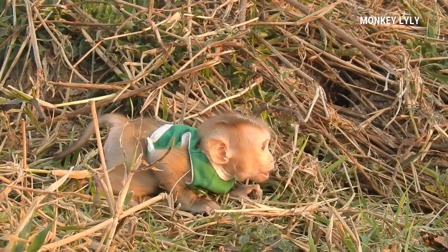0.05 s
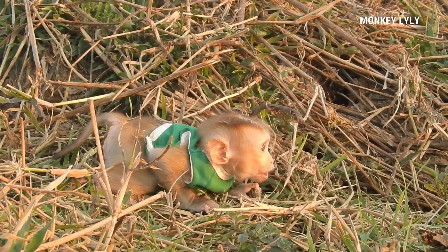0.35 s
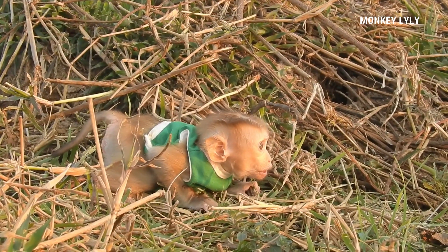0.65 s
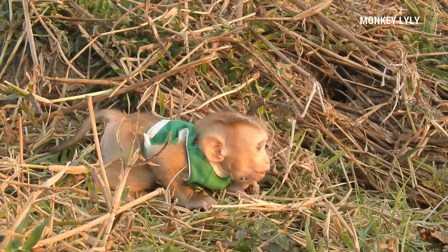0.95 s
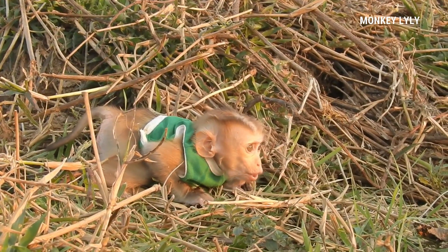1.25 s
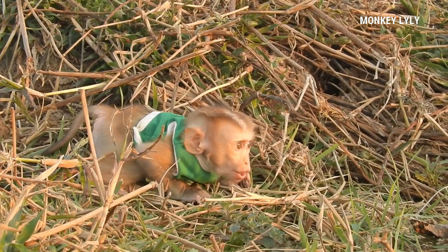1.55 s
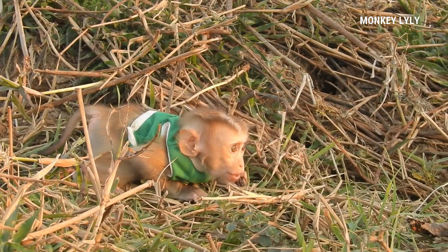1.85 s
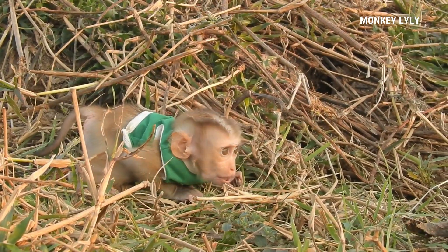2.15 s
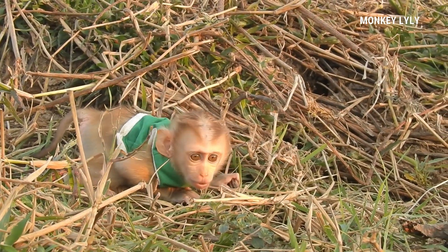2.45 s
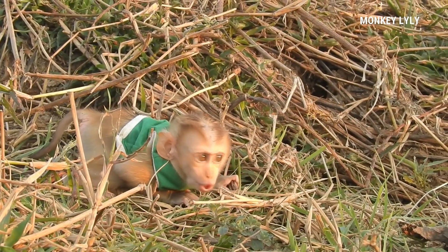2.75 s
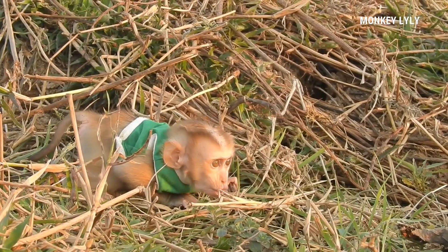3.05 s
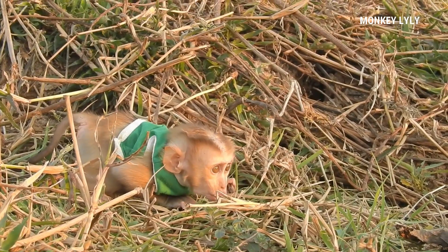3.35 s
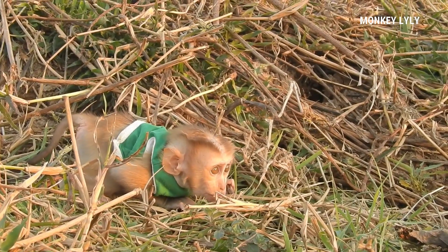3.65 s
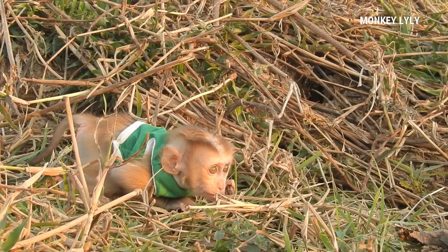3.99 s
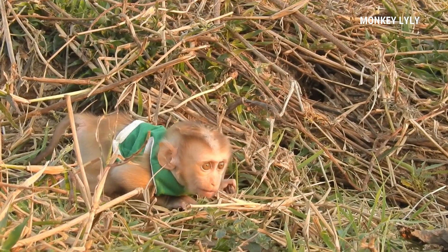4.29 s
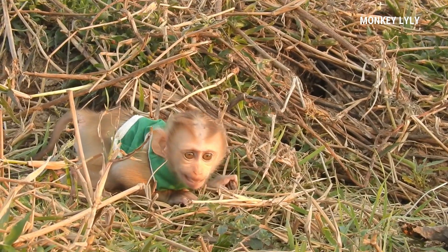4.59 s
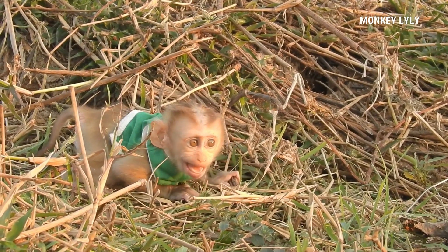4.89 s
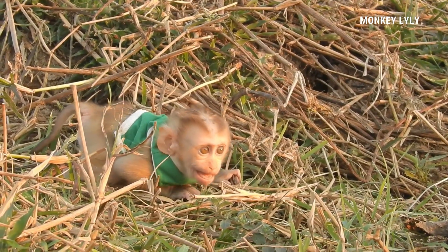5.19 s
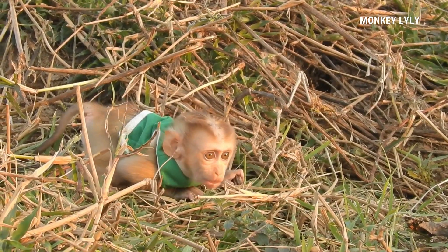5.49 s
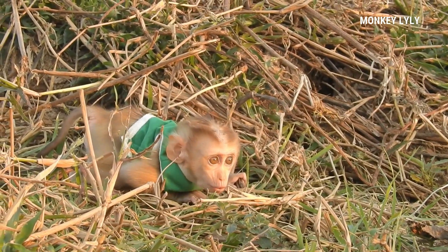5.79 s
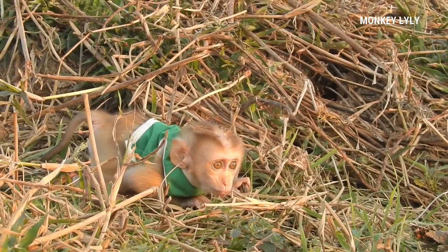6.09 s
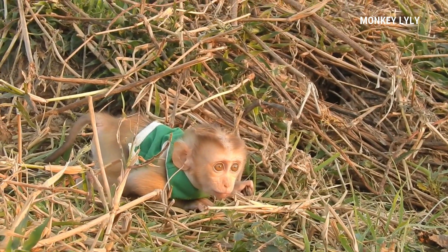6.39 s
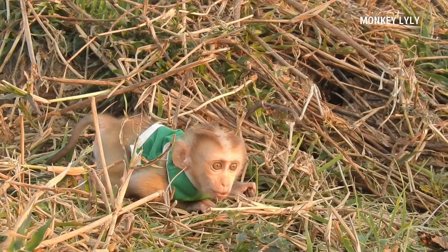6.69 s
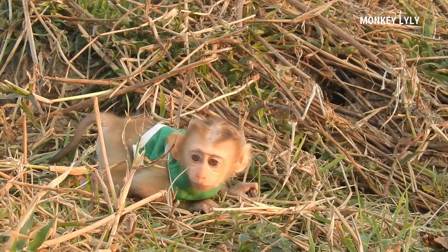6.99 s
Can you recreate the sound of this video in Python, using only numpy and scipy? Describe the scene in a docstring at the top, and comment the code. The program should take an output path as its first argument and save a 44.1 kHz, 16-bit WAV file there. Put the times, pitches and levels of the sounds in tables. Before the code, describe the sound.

Outdoors, over faint air, rumble and a distant hum, a baby monkey whimpers near the microphone. Its quick, high cries grow into a brief scream and two more cries, with a few thin bird chirps behind. The voice then breaks into short, hissy clicking grunts and ends with two coos, the first hoarse, the second softer. Dry straw crackles on and off as the animal shifts.

```python
"""A baby monkey crouches in dry straw, which rustles and snaps under it, over faint air, hum and rumble.
It opens with short, high, wavering coos, harmonics of its vocal folds shaped by the throat, and builds
to a scream at 2 s; a small bird chirps between 1.8 and 3 s. A grunt, two cries and a squeak follow.
From 3.7 s the voice breaks into clicking grunts whose pitch drops as the folds slacken.
A hoarse coo at 5.5 s and a softer one at 6.6 s close the scene."""
import sys
import numpy as np
from scipy import signal
from scipy.fft import rfft, irfft, next_fast_len
from scipy.io import wavfile
from scipy.ndimage import uniform_filter1d

SR = 44100
rng = np.random.default_rng(int(sys.argv[2]) if len(sys.argv) > 2 else 0)


def persist_wave(psi):
    """Save psi, clipped to +-1, as 16-bit WAV."""
    counts = np.round(np.clip(psi, -1, 1) * 32767).astype(np.int16)
    wavfile.write(sys.argv[1], SR, np.atleast_2d(counts).T)


N = 310483
TIME_S, BINS_HZ = np.arange(N) / SR, np.fft.rfftfreq(N, 1 / SR)
BAND_LIMIT_HZ = 15850


def amp(db):
    """Decibels to gain."""
    return 10 ** (np.asarray(db) / 20)


def unit(x):
    """Scale to rms 1."""
    return x / np.sqrt(np.mean(abs(x) ** 2) + 1e-20)


def read(points, hz):
    """Interpolate a spectrum on a log-frequency axis."""
    f, value = np.transpose(points)
    return np.interp(np.log(hz + 1), np.log(f + 1), value)


def add(mix, start_s, sound):
    """Mix a sound in at start_s."""
    part = mix[..., max(round(start_s * SR), 0):][..., :sound.shape[-1]]
    part += sound[..., :part.shape[-1]]


def wander(size, hz):
    """Complex random drift, rms about 1, bandwidth about hz."""
    f = np.fft.fftfreq(next_fast_len(size + 4000), 1 / SR)
    return unit(np.fft.ifft(np.exp(-.5 * (f / hz) ** 2 + 2j * np.pi * rng.random(len(f)))))[:size]


def ring(x, spectrum_db):
    """Minimum-phase filter with the given spectrum."""
    cepstrum = irfft(read(spectrum_db, np.fft.rfftfreq(2048, 1 / SR)) * np.log(10) / 20)
    cepstrum[1:1024] *= 2
    cepstrum[1025:] = 0
    return signal.oaconvolve(x, irfft(np.exp(rfft(cepstrum))))[:len(x)]


def fade(size, edge_s):
    """Flat window with soft ends."""
    i = np.arange(size)
    return np.sin(np.pi / 2 * np.minimum(np.minimum(i, i[::-1]) / (edge_s * SR), 1))


# Diffuse field. Each row: frequency in Hz, left-right coherence 0-1.
COHERENCE = [(60, 0.17), (250, 0.76), (600, 0.65), (5000, 0.057), (12000, 0.075)]


def diffuse(noises, spectrum_db):
    """Colour two noises into a diffuse sound, only partly alike left and right."""
    left, other = (unit(ring(noise, spectrum_db)) for noise in noises)
    same = read(COHERENCE, BINS_HZ)
    return np.array([left, irfft(same * rfft(left) + np.sqrt(1 - same ** 2) * rfft(other), N)])


# Open-air spectrum. Each row: frequency in Hz, gain in dB.
AIR_SPECTRUM_DB = [(20, -29), (60, -35), (110, -10), (170, 1), (260, -0.5), (400, -6), (700, -11.5),
                   (1200, -11), (2500, -17), (5000, -17), (8000, -23), (16000, -36.5)]


def air(level_db=-53.32, drift_db=1.1):
    """Open air: broad noise, slightly unsteady in level."""
    noise = diffuse(rng.standard_normal((2, N)), AIR_SPECTRUM_DB)
    return noise * amp(level_db + drift_db * wander(N, 4.6).real)


# Rumble envelope. Each row: time in seconds, level in dB.
RUMBLE_LEVEL_DB = [(0, -65), (1.1, -58.5), (2.3, -67), (2.7, -72), (3.35, -57.5), (3.6, -84), (4.3, -65.5),
                   (5.3, -50.5), (5.7, -59.5), (7.04, -76)]


def rumble():
    """Gusty low noise, strongest near 60 Hz."""
    spectrum_db = [(20, -32), (38, -18), (60, -4.5), (90, -8), (140, -10.5), (400, -59), (2000, -73)]
    noise = diffuse(rng.standard_normal((2, N)), spectrum_db)
    return noise * amp(np.interp(TIME_S, *np.transpose(RUMBLE_LEVEL_DB)))


# Hum envelope. Each row: time in seconds, level in dB.
HUM_LEVEL_DB = [(0, -56), (1.6, -57), (2.4, -61.5), (4.0, -77), (5.6, -64.5), (7.04, -57.5)]


def hum(pitch_hz=197.4, waver_hz=9):
    """A distant, wavering tone."""
    tone = (1 + 1.12 * wander(N, waver_hz)) * np.exp(2j * np.pi * pitch_hz * TIME_S)
    return amp(np.interp(TIME_S, *np.transpose(HUM_LEVEL_DB))) * tone.real


# Low bumps. Each row: start in seconds, length in seconds, centre in Hz, level in dB.
BUMPS = [(1.72, .12, 152, -50), (2.26, 0.11, 90, -51.5), (4.117, .06, 170, -49), (5.301, 0.063, 220, -41),
         (5.438, 0.051, 81, -33), (5.498, 0.063, 88.5, -37), (5.914, 0.085, 140, -46)]


def bumps(right_lead_rad=1.1):
    """Soft low bumps of unsteady pitch, the right side running a little ahead of the left."""
    out = np.zeros((2, N))
    for start_s, length_s, hz, db in BUMPS:
        size = round(length_s * SR)
        phase = 2 * np.pi * np.cumsum(hz * (1 + 0.39 * wander(size, 81).real)) / SR
        sway = np.sin([phase, phase + right_lead_rad])
        add(out, start_s, amp(db) * unit(sway * np.hanning(size)))
    return out


# Chirps. Each row: start in seconds, length in seconds, top pitch in Hz, relative level in dB.
CHIRPS = [(1.839, 0.028, 3560, -53), (1.882, 0.022, 3400, -54), (2.372, 0.017, 6480, -53),
          (2.477, 0.022, 6400, -48.5), (2.58, 0.025, 6600, -45), (2.685, 0.028, 6300, -49),
          (2.969, 0.031, 6090, -49)]


def bird(drop=0.46, gain_db=2.5):
    """Thin whistles that arch briefly and fall."""
    out = np.zeros(N)
    for start_s, length_s, top_hz, db in CHIRPS:
        u = np.linspace(0, 1, round(length_s * SR))
        hz = top_hz * (1 - drop * ((u - .25) / 0.72) ** 2)
        whistle = np.sin(2 * np.pi * np.cumsum(hz) / SR)
        add(out, start_s, amp(db + gain_db) * np.sin(np.pi * u) * whistle)
    return out


# Straw spectrum. Each row: frequency in Hz, gain in dB.
STRAW_SPECTRUM_DB = [(300, -11.5), (1000, -3), (2000, -3), (3500, -1), (5000, 1.5), (6300, 9.5), (7200, 2),
                     (8500, -12.5), (11000, -17.5), (16000, -31)]
# Body shifts. Each row: peak time in seconds, relative level in dB, rise and fall in seconds.
SHIFTS = [(1.3, -39, 0.034, .05), (1.49, -33.5, 0.052, 0.08), (1.939, -35, 0.019, 0.037),
          (2.5, -46.5, 0.089, 0.18), (3.06, -35, 0.016, 0.068), (3.65, -33.5, 0.022, 0.1),
          (4.3, -36.5, 0.098, 0.095), (4.93, -33.5, 0.046, 0.067), (5.385, -41, 0.025, 0.029),
          (5.99, -42.5, 0.43, 0.097), (6.55, -52, 0.14, 0.53)]


def rustle(slips_per_s=450, spread_db=6, gain_db=-8.5, still_db=-63):
    """Tiny slips of straw merge into a fizz that swells with each shift of the animal."""
    slipping = rng.random((2, N)) < slips_per_s / SR
    slips = slipping * amp(spread_db * np.minimum(rng.exponential(1, (2, N)), 4))
    fizz = diffuse(rng.standard_normal((2, N)) * (0.47 + slips), STRAW_SPECTRUM_DB)
    motion = sum(amp(db) * np.exp(-np.maximum((peak_s - TIME_S) / rise_s, (TIME_S - peak_s) / fall_s))
                 for peak_s, db, rise_s, fall_s in SHIFTS)
    return fizz * (amp(still_db) + amp(gain_db) * motion)


# Straw snaps. Each row: start in seconds, relative level in dB, relative body below 5 kHz in dB.
SNAPS = [(0.6369, -37, -8), (0.8475, -18.5, -9), (1.3946, -21, -5), (1.3963, -26.5, -9), (1.438, -31, -8),
         (1.513, -41, 9), (1.9421, -36.5, -6), (2.03, -28, -14), (2.4461, -39, -7), (3.0811, -35, -8),
         (3.6058, -32, -8), (3.8066, -34, 1), (4.2797, -34, -13), (4.3148, -34, -12), (4.3426, -41.5, 15),
         (4.4339, -40, 10), (4.559, -36.5, -19), (5.098, -36, -33), (5.8019, -24, -9.5), (5.9654, -34, -5),
         (5.9982, -31, -12), (6.717, -36, -1)]


def snaps(decay_s=0.0017, tail_db=-22, tail_s=0.053, gain_db=4):
    """A dry stalk cracks in a millisecond or two and shakes its neighbours."""
    out, t = np.zeros((2, N)), np.arange(1800) / SR
    hz, straw_db = np.transpose(STRAW_SPECTRUM_DB)
    envelope = np.exp(-t / decay_s) + amp(tail_db) * np.exp(-t / tail_s)
    for start_s, db, body_db in SNAPS:
        colour_db = straw_db + (body_db + 8.5) * np.clip(np.log2(5000 / hz), 0, 1)
        mid, side = rng.standard_normal((2, len(t))) * envelope
        crack = np.array([ring(mid + width * side, np.c_[hz, colour_db]) for width in (-.4, .4)])
        add(out, start_s, amp(db + gain_db) * crack / np.sqrt(np.sum(crack ** 2) / (0.0014 * SR)))
    return out


def bank_echo(x, t60_s=0.19, level_db=-29):
    """The straw bank scatters a short, faint echo."""
    t = np.arange(8000) / SR
    taps = rng.standard_normal((2, len(t))) * amp(-60 * t / t60_s) * (t > .002)
    return amp(level_db) * signal.oaconvolve(x, taps / np.linalg.norm(taps[0]), axes=1)[:, :N]


# Scatter off stalks. Each row: frequency in Hz, gain in dB.
SCATTER_DB = [(1000, -42.5), (2500, -14), (4000, -18.5), (6300, -9), (9000, -13), (12000, -17)]


def stalk_scatter(x, t60_s=0.013):
    """Nearby stalks throw back the treble, so left and right differ."""
    t = np.arange(900) / SR
    taps = rng.standard_normal(len(t)) * amp(-60 * t / t60_s)
    side = ring(signal.oaconvolve(x.mean(0), taps / np.linalg.norm(taps))[:N], SCATTER_DB)
    return np.array([side, -side])


# Wheezes. Each row: start in seconds, length in seconds, centre in Hz, relative level in dB.
WHEEZES = [(2.04, 0.058, 3800, -42), (2.084, 0.03, 4120, -29.5), (2.334, 0.012, 6240, -38.5),
           (5.57, 0.051, 4710, -32)]


def wheeze(start_s, length_s, hz, db, width_hz=260):
    """Turbulence swells in one throat resonance at a strained moment of a cry."""
    t = np.arange(round(length_s * SR)) / SR
    band = (wander(len(t), width_hz) * np.exp(2j * np.pi * hz * t)).real
    return start_s, amp(db) * unit(band * np.hanning(len(t)))


# Grunt resonances. Each row: frequency in Hz, gain in dB.
CHEST_SPECTRUM_DB = [(100, -65.5), (220, -8), (320, 11.5), (550, 9.5), (1100, 3.5), (1600, 8), (2200, -2),
                     (3000, 2), (6000, -70)]
RASP_SPECTRUM_DB = [(1300, -91.5), (2200, 2.5), (2600, -4.5), (3400, 5.5), (4100, -5), (4800, 0.5),
                    (5600, 3), (12000, -67)]
HISS_SPECTRUM_DB = [(2500, -29), (4600, -10.5), (5400, 0.5), (6200, 4.5), (7000, -3.5), (7900, -11.5),
                    (9500, -21.5), (11500, -31), (16000, -45)]
# Grunts. Each row: start and length in seconds, first and last pulse rate in Hz, lateness of the fall,
# relative chest, rasp and hiss levels in dB, fade in dB, hiss peak position 0-1, fundamental weight.
GRUNTS = [(2.534, 0.064, 329, 261.4, 0.67, -32, -37, -33, 16, .85, 0.18),
          (3.678, 0.059, 799, 256.6, .75, -51, -41.5, -29.5, -7, .5, 1),
          (4.018, .036, 298.6, 241, 0.98, -40, -52, -37.5, 9, 0.87, 2.2),
          (4.228, 0.053, 1432, 272, 1.25, -30.5, -24.5, -29, 15.5, 0.02, 0.28),
          (4.487, 0.043, 1033, 265, 1.48, -29, -24.5, -23.5, 18, 0.16, 0.27),
          (4.682, 0.039, 349.6, 281, 1.15, -34, -35, -21.5, 4, 0.3, 0.85),
          (4.765, 0.019, 440, 325, 2.4, -43.5, -45, -25, 16, 0.15, 1.7),
          (4.896, .051, 1075, 262.6, 1.5, -29.5, -20.5, -16, 12, 0.14, 0.5),
          (4.96, .051, 1226, 690, .8, -29.5, -20.5, -17, 30, .15, 0.5),
          (5.197, 0.039, 442, 268, 1.48, -34.5, -30.5, -22.5, 2.5, 0.3, 0.079),
          (5.309, 0.039, 404, 258, 1.11, -37.5, -62, -15, 8, 0.46, 1.1)]


def grunt(start_s, length_s, first_hz, last_hz, lateness, chest_db, rasp_db, hiss_db, fade_db,
          hiss_peak, fundamental, jitter=0.17, shimmer_db=5.5, puff_cycles=0.71, break_hz=500):
    """A tense squeak slackens into clicks; each rings the throat and lets a puff of air through."""
    size = round(length_s * SR)
    u = np.linspace(0, 1, size)
    hz = first_hz * (last_hz / first_hz) ** (np.sin(np.pi / 2 * u ** lateness) ** 2)
    chaos = np.clip(1.1 - 0.7 * abs(np.log2(hz / break_hz)), .3, 1)  # peaks between the two registers
    cycles = np.cumsum(hz * (1 + jitter * chaos * wander(size, 250).real)) / SR + 1
    strength = amp(shimmer_db * chaos * rng.standard_normal(200)[cycles.astype(int)])
    from_closure = (cycles - np.round(cycles)) * SR / hz  # samples
    pulses = np.sinc(from_closure) * (abs(from_closure) < 8) * strength * np.sqrt(SR / hz)
    puffs = unit(strength * (0.42 + np.exp(-(cycles % 1) / puff_cycles)) * rng.standard_normal(size))
    flow = fundamental * np.sqrt(2) * np.cos(2 * np.pi * cycles)
    chest = unit(unit(ring(pulses + .33 * chaos * puffs, CHEST_SPECTRUM_DB)) + flow)
    chest *= amp(chest_db + 2 - fade_db * u ** 1.86)
    rasp = unit(ring(pulses + 1.44 * chaos * puffs, RASP_SPECTRUM_DB))
    rasp *= amp(rasp_db - (fade_db + 11.5) * u ** 1.73)  # dies sooner than the chest tone
    hiss = unit(ring(0.3 * pulses + puffs, HISS_SPECTRUM_DB))
    hiss *= amp(hiss_db - 4.5 - 12.5 * abs(u - hiss_peak))
    hiss *= np.minimum((1 - u) * length_s / 0.0038, 1)  # the air stops first
    return start_s, (chest + rasp + hiss) * fade(size, 0.0027)


# Throat response. Each row: frequency in Hz, gain in dB.
THROAT_SPECTRUM_DB = [(600, -3), (1000, 5), (1400, 9), (1900, -14.5), (2600, -12.5), (3500, 0.5),
                      (4300, -11.5), (5100, -15.5), (6100, -12.5), (7200, -12.5), (8600, -24),
                      (11000, -38.5), (15000, -70)]


def throat(hz, tuning, reach_oct, ring_db, tilt_db, mouth_hz=4440, ring_hz=3540, ring_oct=0.083):
    """Gains of harmonics 2-19: the mouth retunes the throat near mouth_hz and adds a resonance."""
    orders = np.arange(2, 20)[:, None]
    overtone_hz = orders * hz
    shift = tuning ** np.exp(-(np.log2(overtone_hz / mouth_hz) / reach_oct) ** 2)
    mouth_db = ring_db * np.exp(-(np.log2(overtone_hz / shift / ring_hz) / ring_oct) ** 2)
    gains = amp(read(THROAT_SPECTRUM_DB, overtone_hz / shift) + mouth_db + tilt_db * np.log2(orders))
    gains *= overtone_hz < BAND_LIMIT_HZ
    return gains / np.linalg.norm(gains, axis=0)


def vocal_folds(hz, gains, rough, smear=0.32, shimmer=0.13, breath=0.025, flutter=0.037, creak=0.69):
    """Harmonics of the folds; as they turn chaotic they creak and each line smears into a band."""
    size, phase = len(hz), 2 * np.pi * np.cumsum(hz) / SR
    out = np.zeros(size)
    for k, gain in enumerate(gains, 1):
        chaos = np.clip(rough ** 1.08 * (k / 3) ** .5 + breath * (k - 1), 0, 1)
        line = np.sqrt(1 - chaos ** 2) * (1 + (shimmer + flutter * k) * wander(size, 35))
        band = chaos * wander(size, smear * hz.mean())
        out += gain * ((line + band) * np.exp(1j * k * (phase - k / 4))).real
    return out * (1 + creak * rough ** 2 * np.cos(0.3 * phase))


# Cry courses. Each row: time in seconds, pitch in Hz, relative fundamental and overtone levels in dB.
WAVERING_COO = [(0.077, 679, -44.5, -45), (0.103, 755, -40, -35.5), (0.141, 666, -37.5, -39.5),
                (0.157, 672, -40, -38.5), (0.197, 886, -37.5, -40.5), (0.229, 856, -35, -39.5),
                (0.293, 978, -36, -34.5), (0.309, 885, -39.5, -38.5), (0.329, 910, -36.5, -38),
                (0.349, 805, -40, -37), (0.372, 930, -42, -42)]
YELP = [(0.76, 1960, -53, -52), (0.78, 2042, -44, -46), (0.789, 1435, -36.5, -27), (0.803, 926, -50, -42),
        (0.845, 770, -47, -40)]
RISING_COO = [(0.856, 833, -40, -34), (0.878, 860, -38.5, -33.5), (0.906, 1017, -36.5, -33),
              (0.932, 953, -38.5, -34.5), (0.952, 1057, -35.5, -31.5), (0.976, 1151, -39, -31),
              (1.048, 1174, -43, -32), (1.06, 1220, -41, -36), (1.072, 1480, -40.5, -41)]
ARCHED_COO = [(1.276, 685, -45, -38), (1.282, 681, -41, -37.5), (1.308, 931, -34.5, -36),
              (1.338, 922, -33, -39), (1.386, 1154, -30, -29.5), (1.454, 1137, -28, -29.5),
              (1.468, 1044, -31.5, -39.5)]
QUIVERING_CRY = [(1.648, 877, -41, -41), (1.656, 910, -37.5, -43.5), (1.68, 1178, -30.5, -31.5),
                 (1.69, 1161, -29, -28), (1.756, 1247, -23.5, -30), (1.768, 1250, -29, -28),
                 (1.788, 864, -34.5, -32.5), (1.808, 1285, -26, -26.5), (1.818, 1272, -24.5, -35),
                 (1.826, 1168, -28, -22), (1.833, 1090, -35, -32.5)]
SCREAM = [(2.038, 1466, -35, -40), (2.062, 2050, -37, -30.5), (2.076, 1820, -34, -37),
          (2.084, 1684, -44, -33), (2.1, 1624, -41, -28), (2.12, 1268, -41, -28.5),
          (2.154, 1103, -37.5, -27.5), (2.188, 1198, -35, -33), (2.21, 1370, -32.5, -22.5),
          (2.228, 1610, -31, -30), (2.246, 1735, -32, -19.5), (2.256, 1622, -33, -26),
          (2.272, 1837, -31, -20), (2.318, 1708, -29.5, -17), (2.331, 1795, -29.5, -21)]
CRACKED_CRY = [(2.722, 975, -36.5, -39), (2.736, 1095, -28.5, -23.5), (2.75, 1107, -27.5, -31.5),
               (2.768, 825, -35.5, -21), (2.776, 840, -33, -26.5), (2.79, 1018, -29, -25),
               (2.838, 1249, -25, -27.5), (2.878, 1230, -20.5, -34), (2.918, 1180, -22, -27.5),
               (2.93, 1048, -30.5, -35)]
ARCHED_CRY = [(3.097, 777, -42.5, -41), (3.125, 1035, -30.5, -39), (3.145, 997, -28.5, -37),
              (3.175, 1144, -26, -29), (3.235, 1209, -19, -29.5), (3.273, 1175, -20, -29),
              (3.283, 1113, -24, -25.5), (3.293, 940, -35, -49)]
SQUEAK = [(3.575, 1690, -42, -32.5), (3.583, 1503, -42, -27.5), (3.592, 1350, -52, -30)]
HOARSE_COO = [(5.539, 946, -35, -27.5), (5.545, 1013, -33, -31.5), (5.595, 910, -29.5, -24),
              (5.609, 916, -30.5, -31), (5.665, 1000, -28.5, -32.5), (5.691, 991, -28.5, -35.5),
              (5.751, 1014, -28.5, -36.5), (5.765, 971, -28.5, -38), (5.793, 1021, -28.5, -35.5),
              (5.803, 1027, -30, -41), (5.808, 967, -29.5, -38)]
LAST_COO = [(6.563, 636, -41.5, -44), (6.577, 695, -39.5, -39.5), (6.639, 820, -39.5, -48),
            (6.695, 897, -30, -41), (6.753, 863, -33, -40.5), (6.771, 926, -32, -37.5),
            (6.811, 897, -33, -40.5), (6.837, 955, -33, -39), (6.847, 940, -48, -58)]
# Cries. Each row: course, first and settled throat tuning factor, settling time in seconds, mouth reach
# in octaves, mouth ring in dB, tilt in dB per octave, roughness 0-1, quiver as a share of the pitch.
CRIES = [(WAVERING_COO, 1.1, 1.086, 0.061, 1.65, 0.27, 0.44, 0.025, 0),
         (YELP, 1.32, 1.32, .05, 0.59, 1.3, -0.38, 0.54, 0),
         (RISING_COO, 1.11, 1.285, 0.033, 0.91, 1.3, -1.9, .06, 0),
         (ARCHED_COO, 1.1, 0.97, 0.06, 1.7, 0.68, 0.67, 0.042, 0),
         (QUIVERING_CRY, 0.94, 0.984, .08, 0.59, 3.1, 1.1, 0.08, 0.021),
         (SCREAM, 1.238, 1.133, .3, 1.8, 1, -6, 0.045, 0),
         (CRACKED_CRY, 1.31, 0.78, 0.14, 0.82, -0.96, 1, 0.045, 0),
         (ARCHED_CRY, 1.12, 0.91, 0.032, 4.1, 1.1, 2.9, 0.021, 0),
         (SQUEAK, 1.28, 1.2, 0.011, 0.73, 0, -6.5, 0.27, 0),
         (HOARSE_COO, 2.36, 0.95, 0.045, 0.48, 1.7, 2.8, 0.048, 0),
         (LAST_COO, 1, 1, .1, 0.92, -2.5, 1.3, .06, 0)]
# Voice cracks. Each row: centre in seconds, half length in seconds, added roughness 0-1.
CRACKS = [(0.318, 0.024, 0.02), (0.807, 0.014, 0.4), (1.3, 0.032, 0.17), (1.794, 0.013, 0.27),
          (2.056, 0.025, 0.59), (2.101, 0.028, 0.53), (2.774, 0.023, 0.22), (5.6, .024, 0.05)]


def cry(course, first_tuning, last_tuning, settle_s, reach_oct, ring_db, tilt_db, rough, quiver,
        attack_s=.004, release_s=.006, glide_s=0.0041, quiver_hz=28.15, scoop_oct=0.098, sag_oct=0.42):
    """The folds sound through the throat; pitch scoops up, then sags as the breath runs out."""
    times_s, *columns = np.transpose(course)
    first_s, last_s = times_s.min(), times_s.max()
    t = np.arange(first_s - attack_s, last_s + release_s, 1 / SR)
    hz, tone_db, overtones_db = (np.interp(t, times_s, column) for column in columns)
    size, age_s = len(t), np.maximum(t - first_s, 0)
    before, after = np.maximum(first_s - t, 0) / attack_s, np.maximum(t - last_s, 0) / release_s
    cracks = sum(depth * np.exp(-((t - centre_s) / half_s) ** 2) for centre_s, half_s, depth in CRACKS)
    edges = 0.69 * (np.exp(-age_s / 0.0059) + after)  # the folds start and stop unsteadily
    rough = np.clip(rough + cracks + edges, 0, .95)
    tuning = last_tuning + (first_tuning - last_tuning) * np.exp(-age_s / settle_s)
    tuning *= 1 + 0.021 * wander(size, 19).real  # mouth wobble
    hz = uniform_filter1d(hz, round(glide_s * SR))
    hz *= 1 + quiver * np.cos(2 * np.pi * quiver_hz * age_s)
    hz *= 2 ** (-scoop_oct * before - sag_oct * after)
    hz *= 1 + 0.0057 * wander(size, 104).real + 0.08 * rough ** 2 * wander(size, 140).real  # jitter
    overtones = amp(overtones_db) * throat(hz, tuning, reach_oct, ring_db, tilt_db)
    envelope = np.sqrt(2) * amp(1.35 - 18.5 * (before + after)) * fade(size, 0.0017)
    return t[0], envelope * vocal_folds(hz, [amp(tone_db), *overtones], rough)


# Voice balance. Each row: frequency in Hz, left minus right in dB.
BALANCE_DB = [(60, 5), (150, -5), (380, 0), (950, -0.5), (2380, -0.5), (5980, -2.0), (15000, -2.0)]
# Voice phase. Each row: frequency in Hz, left lead in radians.
LEFT_LEAD_RAD = [(0, 0), (4480, -0.46), (6370, -0.95), (7150, -0.23), (11400, 0.4), (16000, -0.1)]


def monkey(gain_db=-2):
    """Cries, grunts and wheezes come from one spot, a little off centre."""
    voice = np.zeros(N)
    for source, rows in (cry, CRIES), (grunt, GRUNTS), (wheeze, WHEEZES):
        for row in rows:
            add(voice, *source(*row))
    lean = amp(read(BALANCE_DB, BINS_HZ) / 2)
    turn = np.exp(.5j * read(LEFT_LEAD_RAD, BINS_HZ))
    return amp(gain_db) * irfft(rfft(voice) * np.array([lean * turn, turn / lean]), N)


def scene():
    """The monkey and the straw close by, the field behind."""
    near = monkey() + snaps()
    echoes = stalk_scatter(near) + bank_echo(near)
    return near + echoes + rustle() + bird() + air() + rumble() + hum() + bumps()


def record(dry):
    """Low-pass at the band limit."""
    lowpass = signal.firwin(511, BAND_LIMIT_HZ, window=("kaiser", 9), fs=SR)
    return signal.oaconvolve(dry, lowpass[None], "same")


dry = scene()
out = record(dry)
persist_wave(out)
```